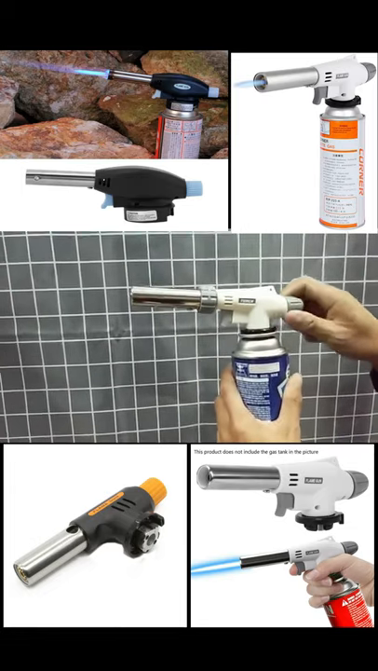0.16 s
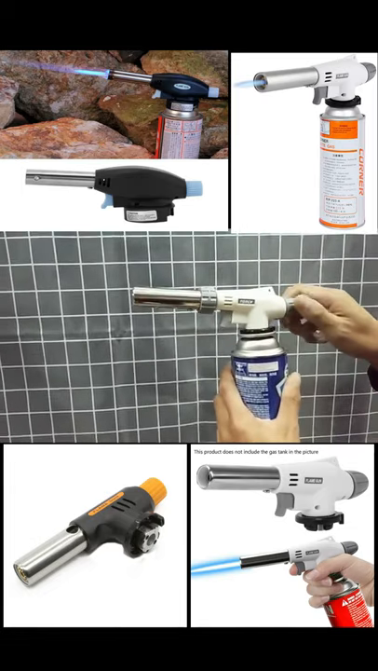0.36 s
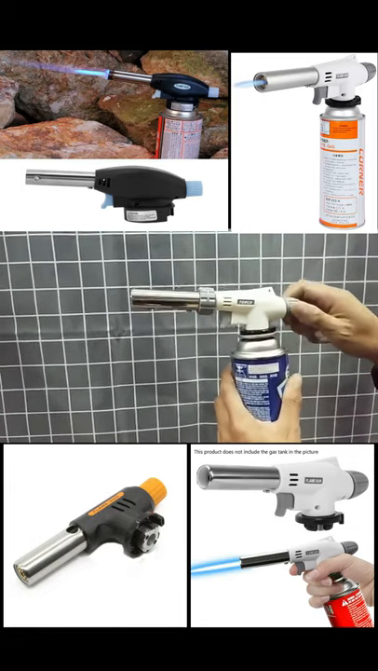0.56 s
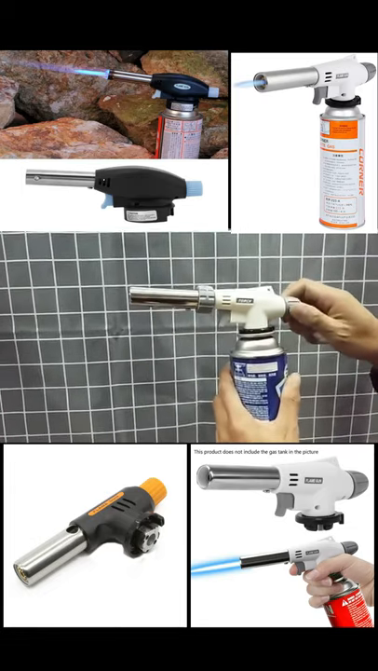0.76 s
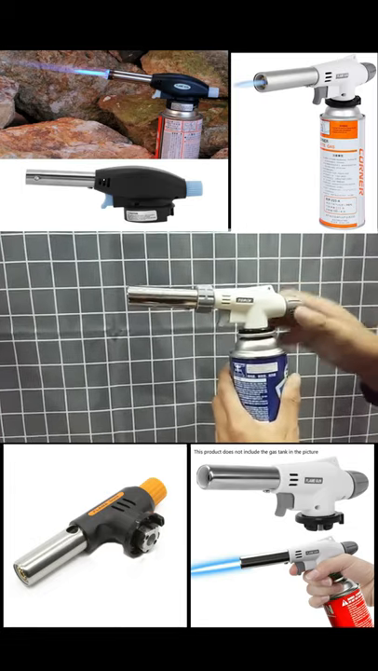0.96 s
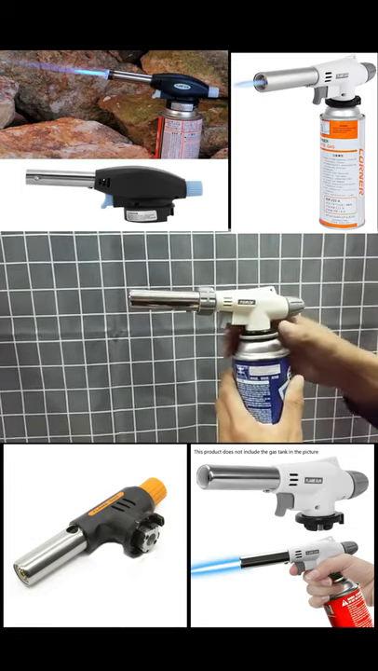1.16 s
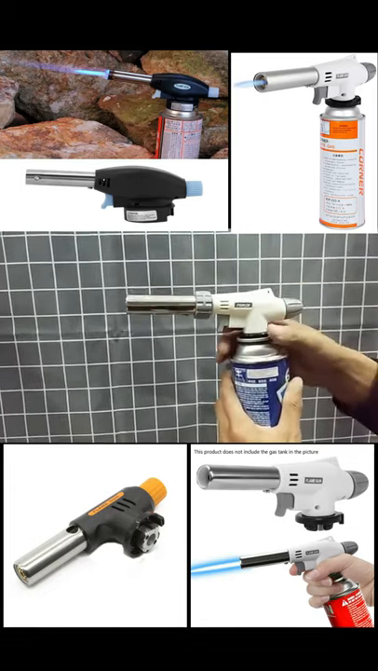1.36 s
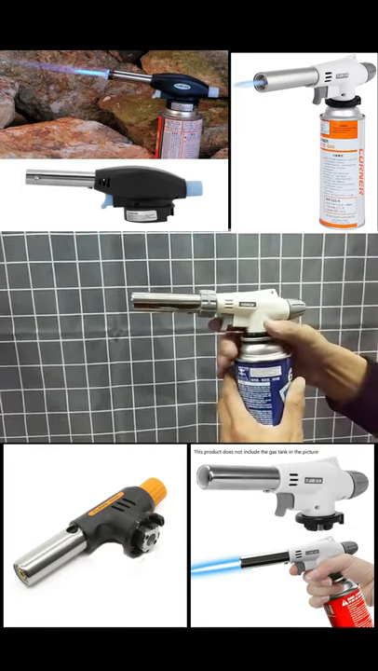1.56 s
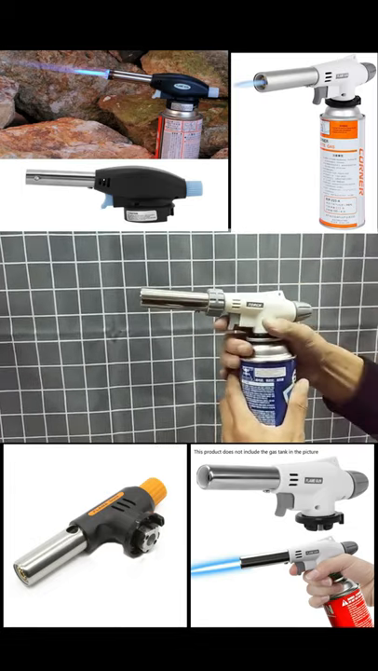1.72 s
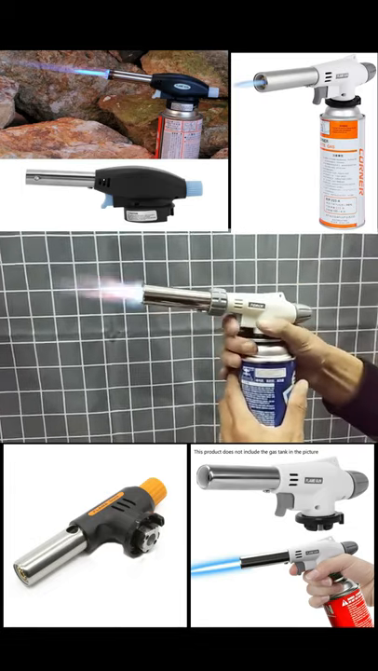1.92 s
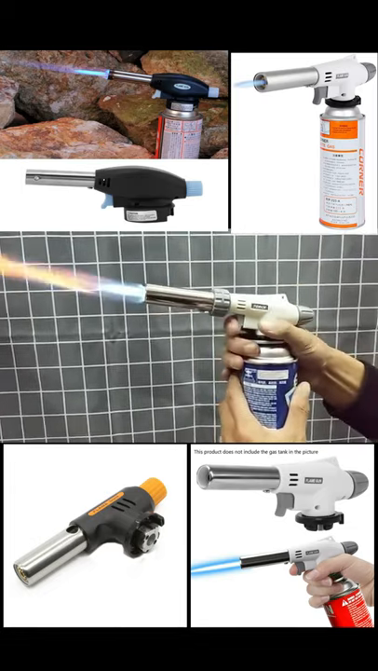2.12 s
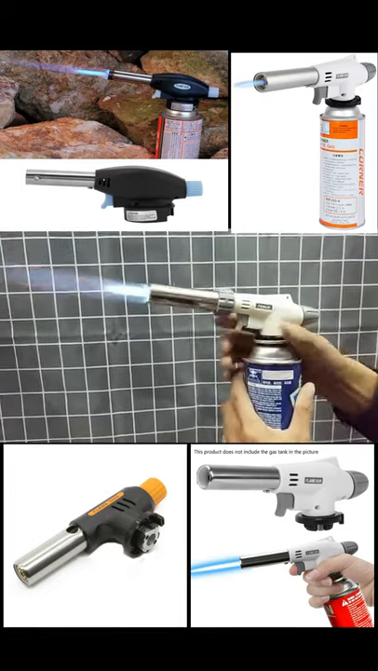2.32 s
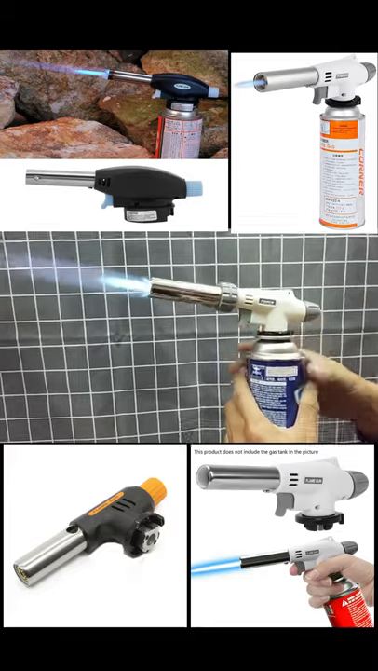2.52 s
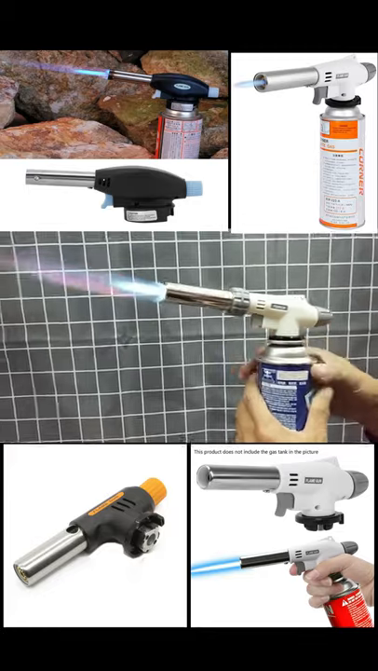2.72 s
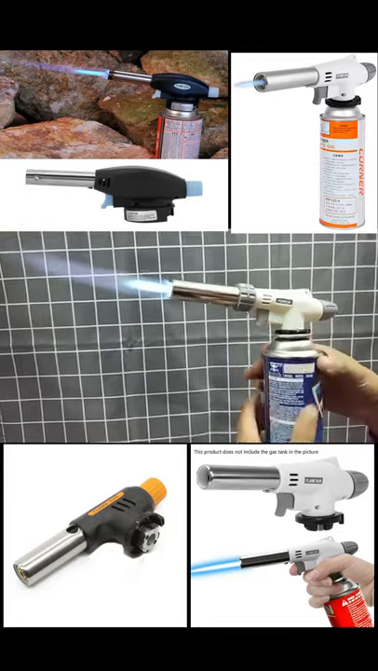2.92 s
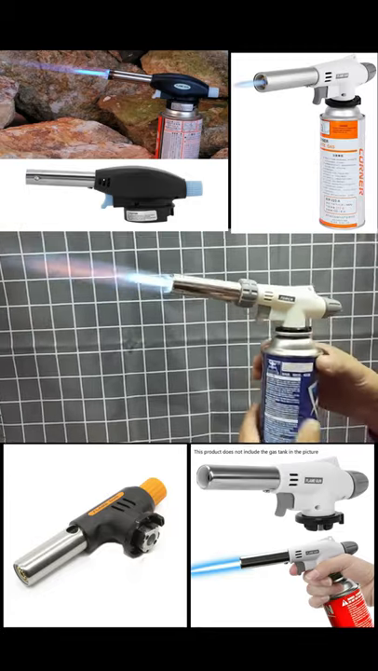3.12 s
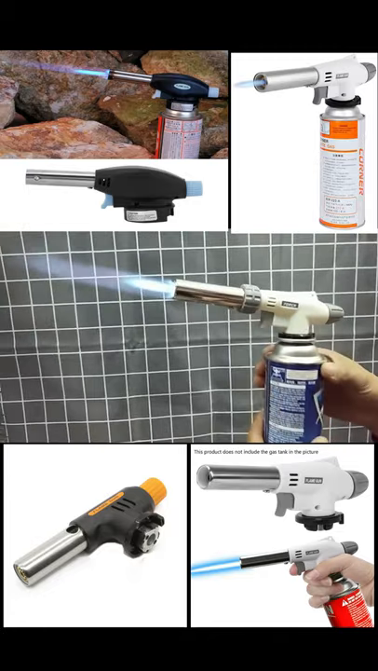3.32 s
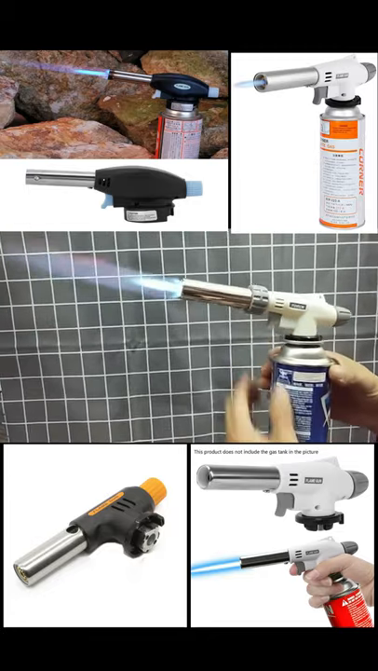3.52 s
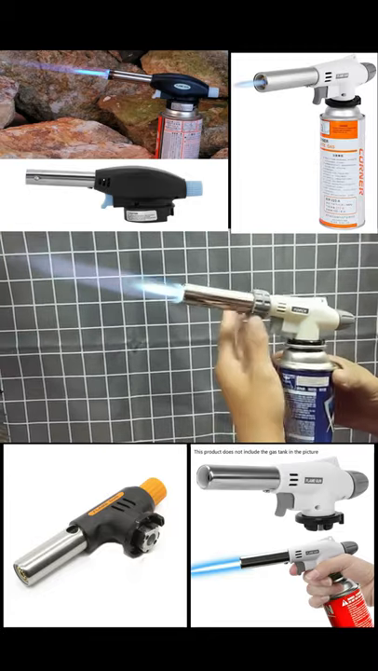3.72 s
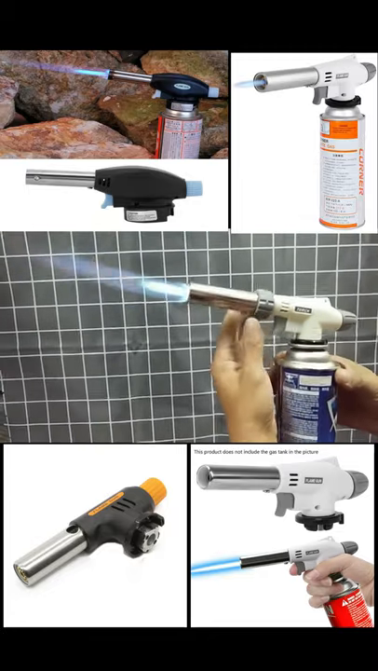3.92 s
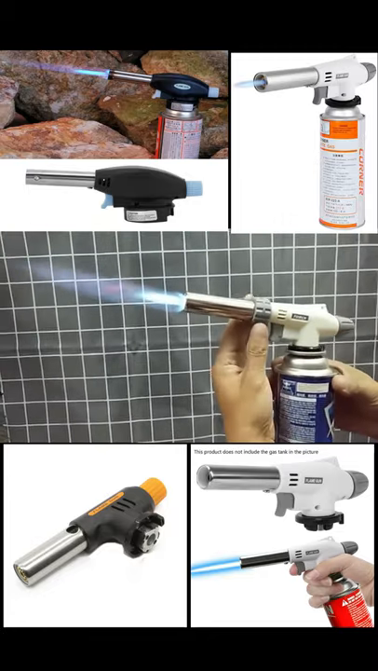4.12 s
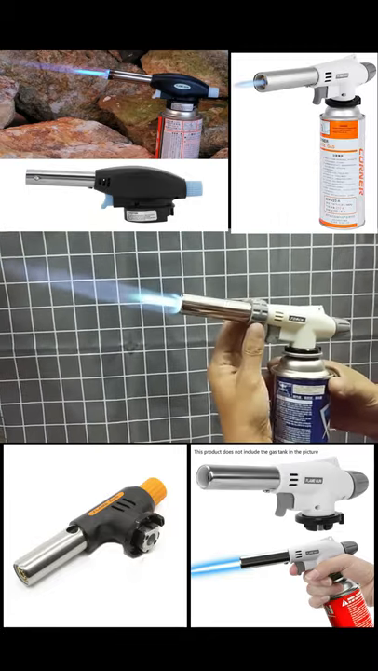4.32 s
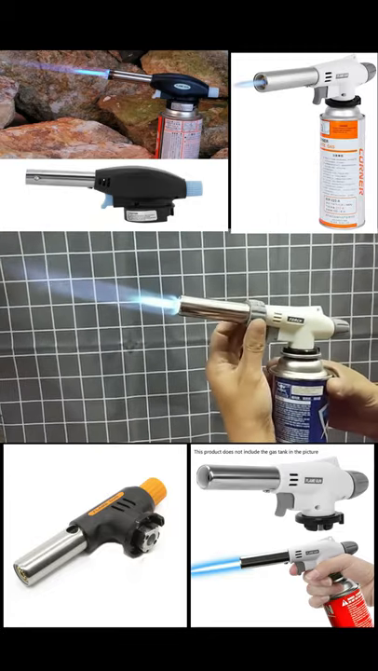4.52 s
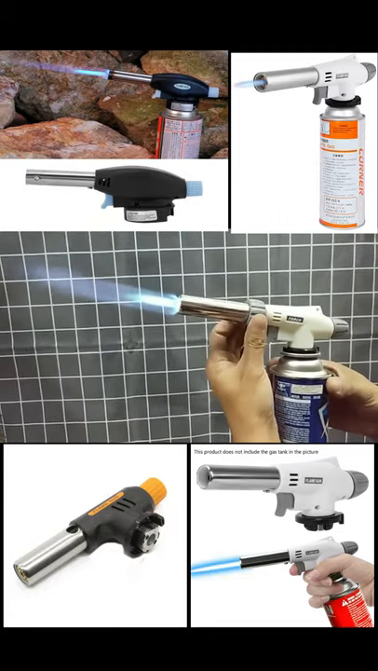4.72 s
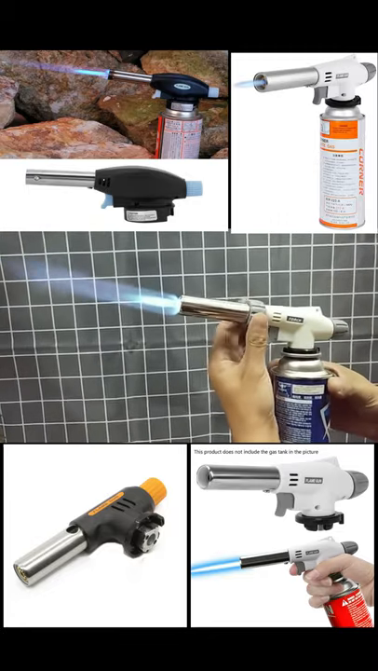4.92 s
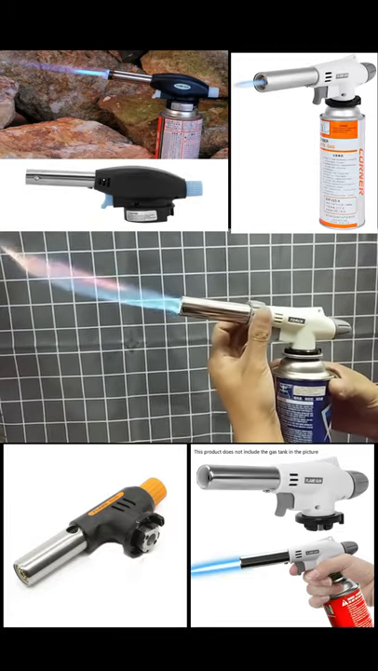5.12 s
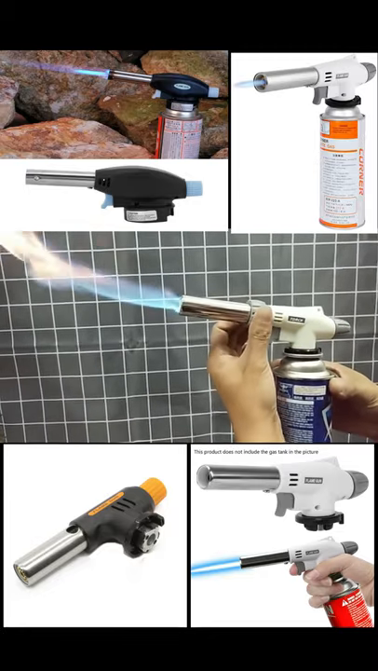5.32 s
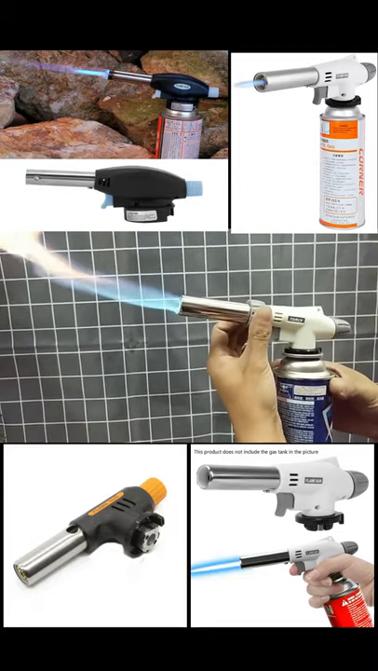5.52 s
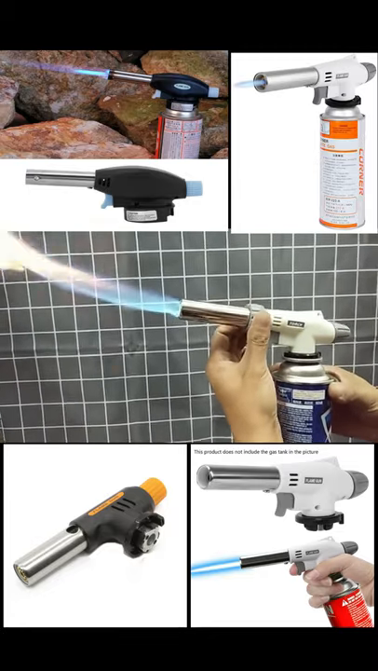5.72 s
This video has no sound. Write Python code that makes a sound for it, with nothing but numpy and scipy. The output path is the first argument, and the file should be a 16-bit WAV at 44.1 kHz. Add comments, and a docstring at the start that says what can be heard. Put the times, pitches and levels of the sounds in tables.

```python
"""A hand-held butane torch, close up in a small, quiet room.
The valve opens in two twists and cold gas hisses through the burner tube. The piezo trigger clicks,
then snaps; the gas catches just before 2 s and the trigger springs back. A blue flame rushes through
the tube over a low rumble of burning eddies. From about 4 s the air collar narrows and starves it;
near 5 s the collar shuts, leaving a soft, flapping yellow flame and a thinner hiss."""
import sys
import numpy as np
from scipy import signal
from scipy.fft import rfft, irfft
from scipy.io import wavfile
from scipy.ndimage import uniform_filter1d

SR = 44100
rng = np.random.default_rng(int(sys.argv[2]) if len(sys.argv) > 2 else 0)


def unload_audio(sound):
    """Save the sound as a 16-bit wav file, at the path given as the first command line argument."""
    columns = np.transpose(np.atleast_2d(sound))
    # keep every value between -1 and 1, then stretch to whole-number steps
    steps = np.round(np.clip(columns, -1, 1) * 32767)
    wavfile.write(sys.argv[1], SR, steps.astype(np.int16))


N = 254898
TIME = np.arange(N) / SR
BINS = np.fft.rfftfreq(1024, 1 / SR)  # frequencies for shaping noise, Hz
FRAMES = np.arange(N // 256 + 5) * 256 / SR  # times for shaping noise, s
LIGHT_S, SHUT_S = 1.965, 5.085  # the gas catches, the collar shuts
BLUE_S = LIGHT_S + 0.053  # the blue cone builds up


def amp(db):
    """Decibels to gain."""
    return 10 ** (np.asarray(db) / 20)


def unit(x):
    """Scales to rms 1."""
    return x / np.sqrt(np.mean(x ** 2) + 1e-20)


def curve(points, hz):
    """Joins the points of a curve on a log-frequency axis."""
    f, value = np.transpose(points)
    return np.interp(np.log(hz + 1), np.log(f), value)


def after(s, ease_s, t=TIME):
    """A smooth fade from 0 to 1 around the time s."""
    return .5 + .5 * np.tanh((t - s) / ease_s)


def bells(modes, hz=BINS):
    """Bell-shaped peaks and dips, in dB."""
    return sum(db * .5 ** ((2 * (hz - f) / width) ** 2) for f, width, db in modes)


def band(hz, width):
    """Steady noise in one narrow band, rms 1."""
    offset = (np.fft.rfftfreq(N, 1 / SR) - hz) / (width / 2)
    return unit(irfft(rfft(rng.standard_normal(N)) / (1 + offset ** 2 / 2) ** 2, N))


def turbulence(shape_db, patchy_db, unit_band_hz=(20, 20000)):
    """Coloured noise with drifting eddies, scaled so the part in unit_band_hz has rms 1."""
    real, imag, eddies = rng.standard_normal((3, len(FRAMES), len(BINS)))
    eddies = uniform_filter1d(eddies, size=7, axis=0)
    eddies = unit(uniform_filter1d(eddies, size=9, axis=1))
    spectra = (real + 1j * imag) * amp(shape_db + patchy_db * eddies)
    in_band = spectra * ((BINS >= unit_band_hz[0]) & (BINS <= unit_band_hz[1]))
    whole, part = signal.istft(np.array([spectra.T, in_band.T]), nperseg=1024, noverlap=768)[1][:, :N]
    return whole / np.std(part)


def flutter(depth_db, top_hz):
    """A random gain that wavers mostly at rates below top_hz."""
    rates = np.fft.rfftfreq(N, 1 / SR)
    weight = rates / (rates + top_hz / 10) / (1 + (rates / top_hz) ** 2)
    waver = unit(irfft(rfft(rng.standard_normal(N)) * weight, N))
    return amp(depth_db * waver)


# Colour of the quiet room. Each row: frequency in Hz, relative level in dB.
ROOM_TONE = [(20, -30), (45, -13), (110, 0), (190, -6.5), (260, -9), (400, -10.5), (750, -12.5),
             (1500, -12.5), (3000, -8), (4500, -22), (6000, -60), (15000, -60)]
def room_tone():
    """A faint, dark bed of steady noise."""
    return amp(-54.5) * turbulence(curve(ROOM_TONE, BINS), patchy_db=0.1)


# The room's tail. Each row: frequency in Hz, seconds to fall by 60 dB.
ROOM_DECAY = [(150, 0.53), (1000, 0.19), (4000, 0.43), (14000, 0.26)]
def reverb(x):
    """Sparse wall reflections; the mids die first and the bass hangs longest."""
    t = np.arange(SR // 2) / SR
    signs = rng.choice([-1., 1.], len(t))
    echoes = signs * (rng.random(len(t)) < 2000 / SR) * (t > .003)  # about 2000 a second
    hz, age_s, spectra = signal.stft(echoes, SR, nperseg=256)
    decay = amp(-60 * age_s / curve(ROOM_DECAY, hz)[:, None])
    tail = signal.istft(spectra * decay, SR, nperseg=256)[1]
    return signal.fftconvolve(x, tail / np.linalg.norm(tail))[:N]


# Twists of the gas valve. Each row: midpoint in seconds, ease in seconds, share of full flow added.
VALVE_TWISTS = [(0.119, 0.091, 0.43), (0.56, 0.094, 0.55)]
def gas_flow(t=TIME):
    """Share of the full gas flow: each twist of the valve adds to it."""
    return sum(share * after(s, ease, t) for s, ease, share in VALVE_TWISTS)


def drone():
    """A faint low drone wavers under the hiss and grows with the gas flow."""
    return band(hz=154.4, width=9.9) * amp(-63.5) * np.sqrt(gas_flow())


# Colour of the unlit jet. Each row: frequency in Hz, relative level in dB.
COLD_JET = [(150, -20.5), (700, -30), (1100, -23), (1400, -14), (2080, -20.5), (2290, -1.5), (4270, 0.5),
            (4600, -16), (5000, -24.5), (6300, -28), (7000, -39), (13000, -43.5), (15000, -33),
            (16000, -42)]
# Resonances of the cold tube. Each row: centre in Hz, width in Hz, gain in dB.
COLD_TUBE = [(2367, 140, 6), (2700, 240, -1.5), (3270, 230, 4.5), (5850, 300, 4), (7520, 400, 9),
             (9060, 330, 8.5), (10800, 390, 9.5), (12170, 540, 13)]
def cold_gas(treble_lift_db=0.5):
    """The jet blows through the tube until the spark lights it, a touch brighter at low flow."""
    shortfall = 1 - gas_flow(FRAMES)[:, None]
    treble = np.clip(np.log2((BINS + 1) / 4000), 0, 1)
    colour_db = curve(COLD_JET, BINS) + bells(COLD_TUBE) + treble_lift_db * shortfall * treble
    hiss = turbulence(colour_db, patchy_db=1.0) * amp(-34.5)
    unlit = 1 - after(LIGHT_S, 0.007)
    return hiss * gas_flow() * flutter(depth_db=0.6, top_hz=45) * unlit


# Collar twists before it shuts. Each row: midpoint in seconds, ease in seconds, rush lost in dB.
COLLAR_TWISTS = [(4.12, 0.3, 2.0), (4.76, 0.076, 5.5)]
def rush_lost_db():
    """Each twist of the collar takes air from the flame and turns its rush down."""
    return sum(db * after(s, ease) for s, ease, db in COLLAR_TWISTS)


def collar_turn():
    """How far the collar has turned: 0 wide open, 1 about to shut."""
    lost_db = rush_lost_db()
    return lost_db / lost_db[-1]


# Colour of the jet without air. Each row: frequency in Hz, relative level in dB.
CHOKED_JET = [(500, -38), (1250, -25), (1780, -32), (2130, -3), (2820, -9.5), (3050, 5), (3850, -3),
              (4600, -8), (5100, -28.5), (6250, -25.5), (7000, -43), (8100, -58), (9000, -42.5),
              (15000, -33.5)]
# Resonances of the choked tube. Each row: centre in Hz, width in Hz, gain in dB.
CHOKED_TUBE = [(3260, 720, 3.3), (4170, 200, 6.2), (6160, 180, 5.2), (9070, 670, 13.6), (11860, 380, 10)]
def choked_gas(shut_boost_db=4.5, sag_db_per_s=2.5):
    """The jet's own sputtering hiss comes through as the collar closes, then sags once it is shut."""
    hiss = turbulence(curve(CHOKED_JET, BINS) + bells(CHOKED_TUBE), patchy_db=0.6)
    sag_db = sag_db_per_s * np.maximum(TIME - SHUT_S, 0)
    level_db = -41.5 + shut_boost_db * after(SHUT_S, 0.0082) - sag_db
    return hiss * amp(level_db) * after(4.3, 0.78) * flutter(depth_db=0.57, top_hz=50)


# Hiss of the air intake. Each row: centre in Hz, width in Hz, open-collar level in dB, change when
# narrowed in dB, then one swell's midpoint in seconds, half length in seconds and height in dB.
INTAKE_BANDS = [(6430, 260, -72.5, 0, 2.8, 0.64, 4.5), (9130, 350, -79, 4.5, 3.57, 0.35, 6.5),
                (12300, 420, -75, -6, 4.32, 0.24, 8), (14500, 1700, -72.5, 5.5, 4.6, 0.3, 1.5)]
def air_intake():
    """Air hisses in through the collar; handling swells each band and the closing gap rebalances them."""
    turn, hiss = collar_turn(), 0
    for hz, width, db, change_db, swell_s, half_s, swell_db in INTAKE_BANDS:
        swell = np.exp(-((TIME - swell_s) / half_s) ** 4)
        hiss += band(hz, width) * amp(db + change_db * turn + swell_db * swell)
    drawing_air = after(BLUE_S, 0.022) * (1 - after(SHUT_S, .03))
    return hiss * drawing_air * flutter(depth_db=0.5, top_hz=80)


# Blows of the trigger. Each row: start in seconds, ring, tick and thump levels in dB (the tick
# before its trim), pitch struck hardest in Hz, spread around that pitch in octaves.
TRIGGER_BLOWS = [(1.6393, -13.5, -68, -66, 2340, 0.54), (1.9518, -10, -14, -51, 3800, 1.3),
                 (1.9531, -2.5, -24, -21.5, 3630, 1.7), (2.2188, -8, -25, -55, 5200, 0.2),
                 (2.2195, -1.5, -28, -54, 3010, 0.099)]
# Modes of the plastic body and tube. Each row: pitch in Hz, relative level in dB, seconds to fall 60 dB.
BODY_MODES = [(1500, -7.5, 0.016), (2300, -6, 0.016), (3110, -0.5, 0.013), (3430, 2, 0.013),
              (4240, -4, 0.018), (4200, -15, 0.01), (4690, -5.5, 0.012), (5300, -16, 0.012),
              (5900, -29, .012), (10800, -30, .008), (12400, -27, 0.02), (13000, -23, .012)]
def trigger(rise_s=0.00022, tick_s=0.00064, tick_trim_db=-4.5, thump_hz=135, thump_s=0.0056):
    """Each blow of the piezo igniter ticks, rings the body and thumps the gas can."""
    clicks, t = np.zeros(N), np.arange(SR // 10) / SR
    attack = (1 - np.exp(-t / rise_s)) ** 2  # the ring swells in gently rather than starting at full strength
    for start_s, ring_db, tick_db, thump_db, centre_hz, spread in TRIGGER_BLOWS:
        ring = 0
        for hz, db, t60 in BODY_MODES:
            share = 1 / (1 + (np.log2(hz / centre_hz) / spread) ** 2)
            ring += share * amp(ring_db + db - 60 * t / t60) * np.sin(2 * np.pi * hz * t)
        tick = amp(tick_db + tick_trim_db) * rng.standard_normal(len(t)) * np.exp(-t / tick_s)
        thump = amp(thump_db) * np.sin(2 * np.pi * thump_hz * t) * np.exp(-t / thump_s)
        start = round(start_s * SR)
        clicks[start:start + len(t)] += ring * attack + tick + thump
    return clicks


# Colour of the flame's low end. Each row: frequency in Hz, relative level in dB.
THROB = [(25, -44), (55, -13), (77, 7), (100, 0), (140, -6), (300, -63)]
def flame_throb(puff_s=0.16, lead_s=0.083, swell_s=0.093):
    """A deep puff on lighting, a swell just before the cone collapses, then the yellow flame flaps."""
    puff = amp(-51) * np.exp(-np.maximum(TIME - LIGHT_S, 0) / puff_s)
    collapse = amp(-50) * np.exp(-((TIME - SHUT_S + lead_s) / swell_s) ** 2)
    steady = amp(-65) + amp(-58) * after(SHUT_S, 0.2)  # stronger once the flame is yellow
    low_cut = signal.butter(4, 55, "highpass", fs=SR, output="sos")
    flapping = signal.sosfilt(low_cut, turbulence(curve(THROB, BINS), patchy_db=3.5))
    return flapping * (puff + collapse + steady) * after(LIGHT_S, .02)


# Broad peaks and dips of the lit tube. Each row: centre in Hz before tuning, width in Hz, gain in dB.
HOT_TUBE = [(734, 275, -7), (1861, 314, -10.5), (2430, 230, 1.5), (2954, 270, -6.5), (3640, 360, 3),
            (4210, 480, -5.5)]
# The tube sings just after lighting. One row: centre in Hz, width in Hz, gain in dB.
LIGHTING_SONG = [(3100, 280, 9.5)]
def hot_tube_db(fresh=1.099, settled=1.027, shaded=0.934, song_s=0.36):
    """The tube sings briefly; its tuning sinks as the flame settles and as the hand nears the collar."""
    settling = (settled - fresh) * after(2.38, 0.08, FRAMES)
    hand_shading = (shaded - settled) * after(3.33, 0.041, FRAMES)
    tuning = fresh + settling + hand_shading  # factor on frequency
    singing = np.exp(-((FRAMES[:, None] - LIGHT_S) / song_s) ** 4)
    return bells(HOT_TUBE, BINS / tuning[:, None]) + singing * bells(LIGHTING_SONG)


# Colours of the flame's low, middle and top layers. Each row: frequency in Hz, relative level in dB.
RUMBLE = [(20, -35), (45, -36), (78, -22), (110, -11.5), (205, 5), (280, -7), (400, -6.5), (650, -22.5),
          (1500, -55.5)]
RUSH = [(120, -53), (260, 2.5), (390, 4.5), (520, 0), (950, 0.5), (1500, -1), (2450, 2.5), (3600, 0.5),
        (4150, -5), (4650, -8), (5100, -24.5), (5700, -33.5), (6500, -44), (7500, -52)]
FIZZ = [(3000, -12), (5200, 15), (5900, 10), (6950, 3.5), (7800, 8), (8600, 2), (9700, 4.5), (11300, -0.5),
        (13000, 2), (16000, -3)]
# Resonances of the space around the flame. Each row: centre in Hz, width in Hz, gain in dB.
NEARBY_SPACE = [(238, 38, 6), (271, 15, -6), (369.6, 47, 4.5), (428, 35, -4.5), (480.8, 28, 6),
                (738, 35, -2.5), (952, 123, 3), (1052, 42, 4), (1288, 39, 3)]
def flame(first_puff=0.2, deepening=0.11):
    """Burning eddies rumble and the blue cone rushes through the tube until lack of air collapses it."""
    lit = after(LIGHT_S, 0.004) * (first_puff + (1 - first_puff) * after(BLUE_S, 0.023))
    turn, shut = collar_turn(), after(SHUT_S + 0.013, 0.031)
    # Less air means less rush and fizz but a stronger, deeper rumble; all drop when the collar shuts.
    rumble_gain = amp(-40 + 3.5 * turn - 18 * shut)
    rush_gain = amp(-35 - rush_lost_db() - 22 * shut)
    fizz_gain = amp(-76 - 6 * turn) * (1 - shut)
    eddy_rate = 1 - deepening * np.interp(FRAMES, TIME, turn)[:, None]
    rumble_colour = curve(RUMBLE, BINS / eddy_rate) + bells(NEARBY_SPACE)
    rush_colour = curve(RUSH, BINS) + bells(NEARBY_SPACE) + hot_tube_db()
    rumble = rumble_gain * turbulence(rumble_colour, patchy_db=0, unit_band_hz=(90, 280))
    rush = rush_gain * turbulence(rush_colour, patchy_db=0.5, unit_band_hz=(800, 1600))
    fizz = fizz_gain * turbulence(curve(FIZZ, BINS), patchy_db=3, unit_band_hz=(9700, 11700))
    rumble *= flutter(depth_db=0.5, top_hz=15)
    cone = (rush + fizz) * flutter(depth_db=0.74, top_hz=121)
    return lit * (rumble + cone)


def scene():
    """The torch up front, with faint reflections and the quiet room behind it, in mono."""
    torch = cold_gas() + flame() + flame_throb() + air_intake() + choked_gas()
    clicks = trigger()
    bed = room_tone() + drone()
    reflections = reverb(amp(-13.5) * torch + amp(-19.5) * clicks)
    return (torch + clicks + reflections + bed)[None]


def record(dry, ceiling=.82, cutoff_hz=15560):
    """Deep bass is cut away, overload rounds the loudest snap, a steep filter cuts the top."""
    lean = signal.sosfilt(signal.butter(2, 40, "highpass", fs=SR, output="sos"), dry)
    rounded = lean / (1 + (lean / ceiling) ** 4) ** (1 / 4)
    high_cut = signal.firwin(511, cutoff_hz, window=("kaiser", 8), fs=SR)
    return signal.oaconvolve(rounded, high_cut[None], "same")


dry = scene()
out = record(dry)
unload_audio(out)
```